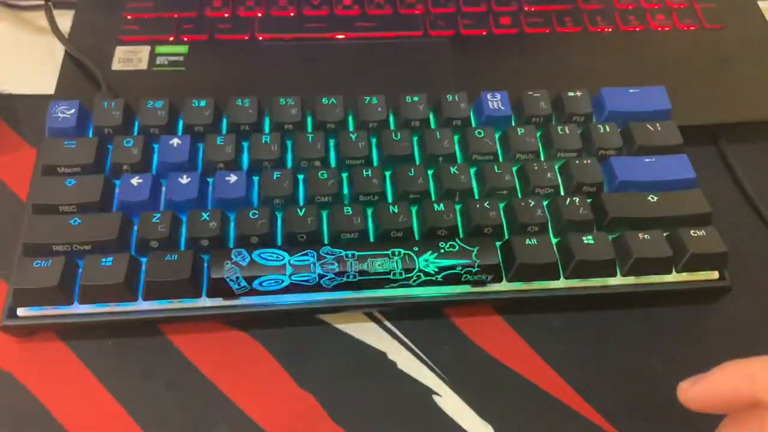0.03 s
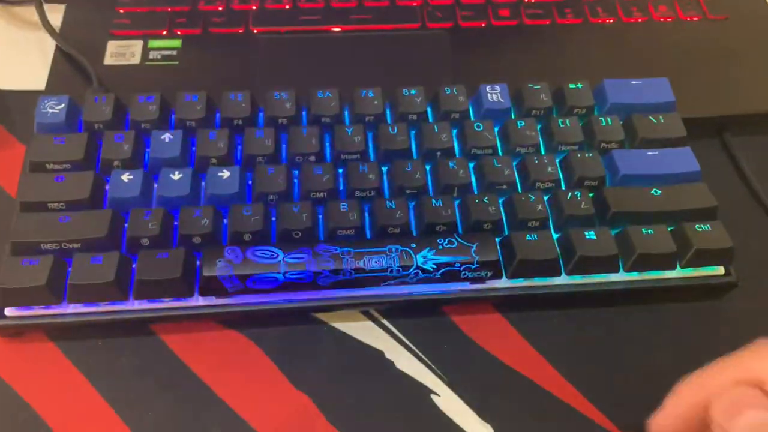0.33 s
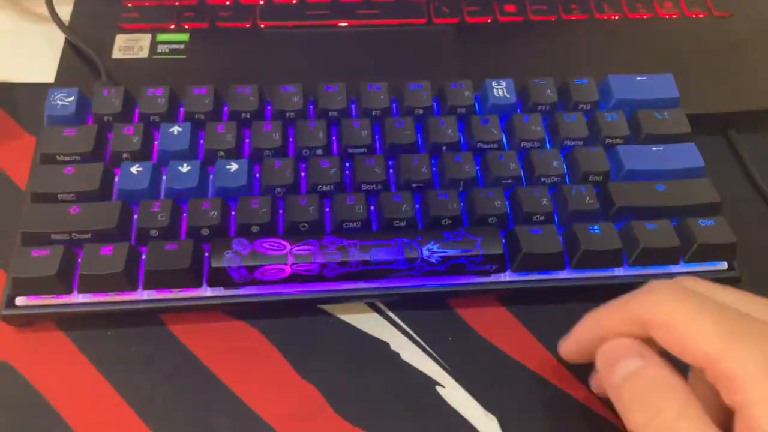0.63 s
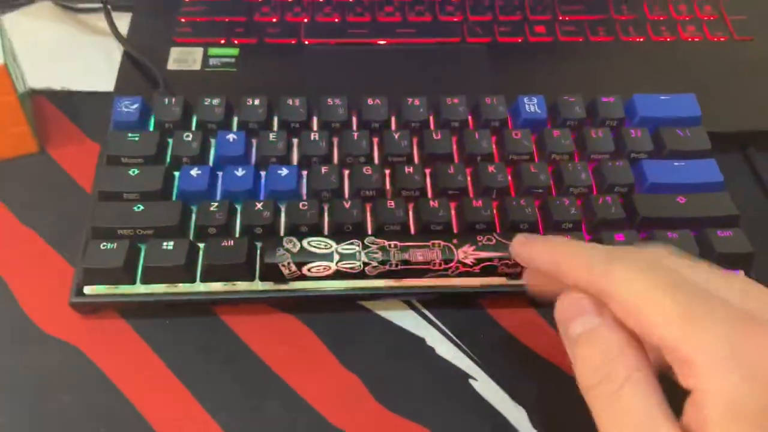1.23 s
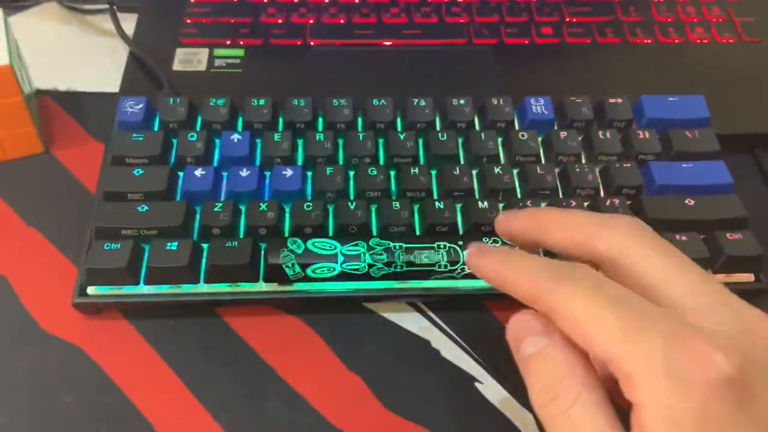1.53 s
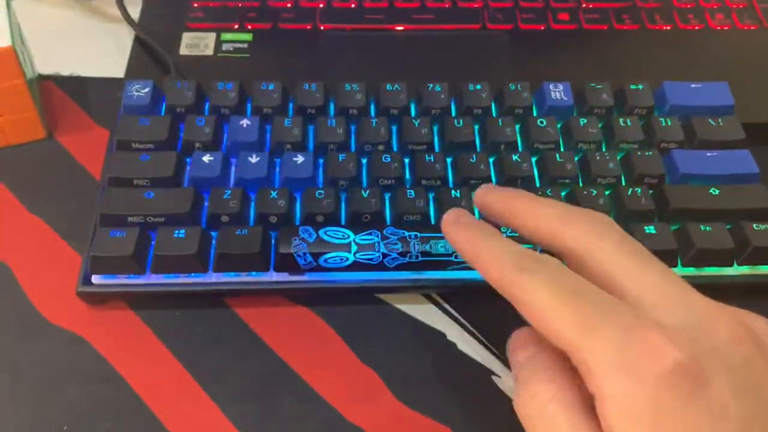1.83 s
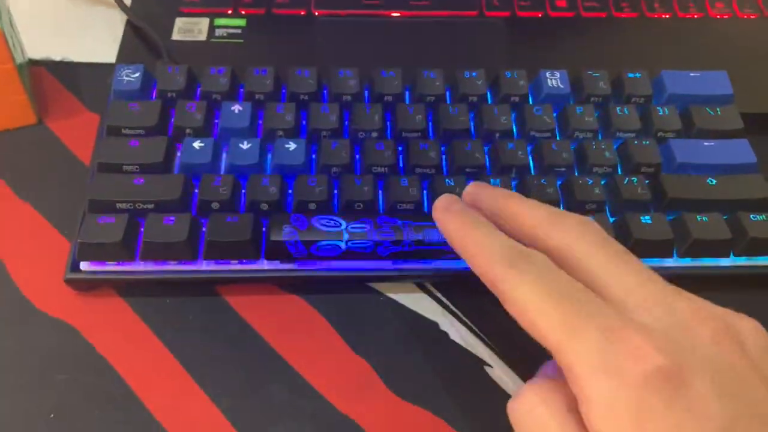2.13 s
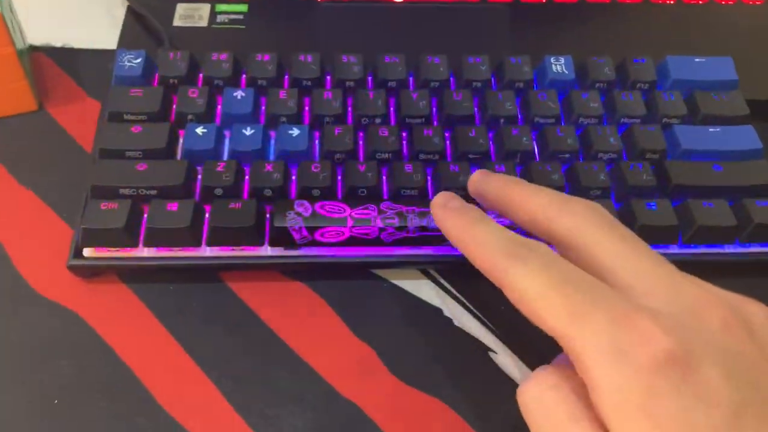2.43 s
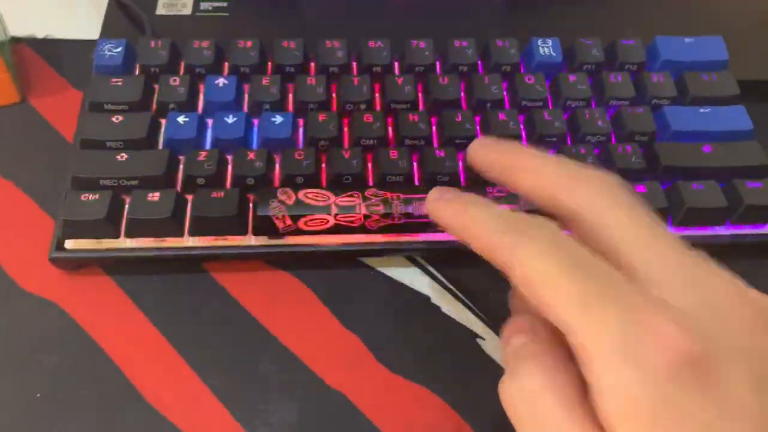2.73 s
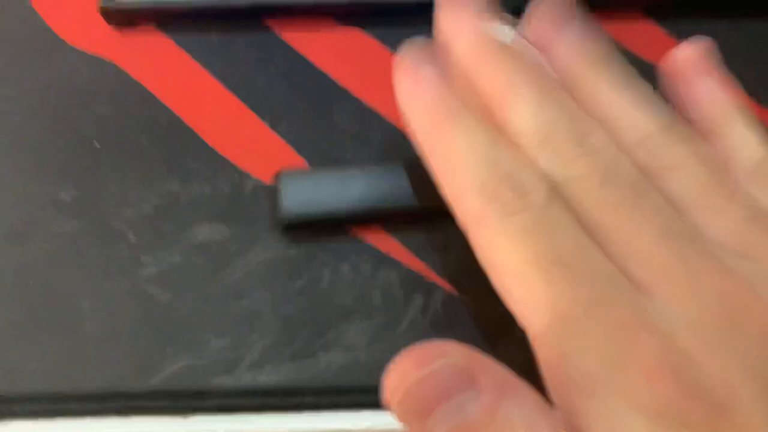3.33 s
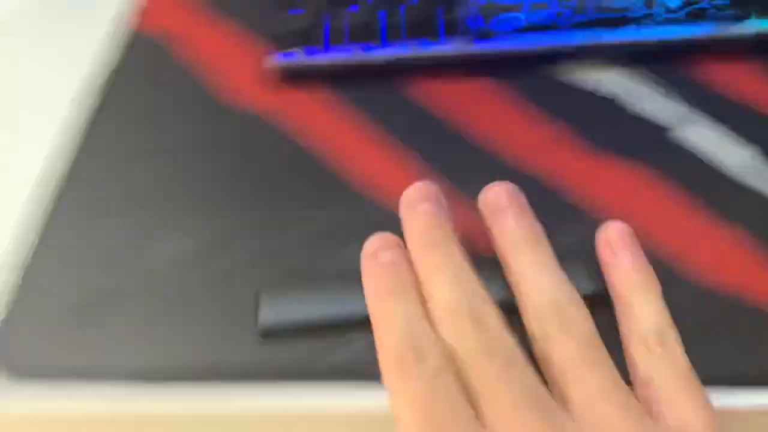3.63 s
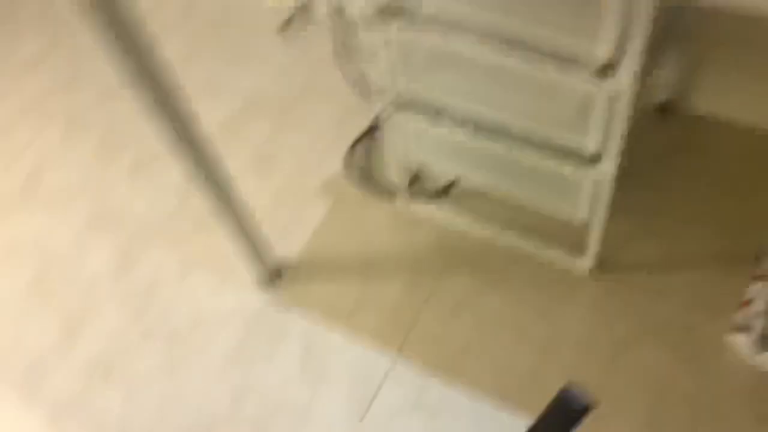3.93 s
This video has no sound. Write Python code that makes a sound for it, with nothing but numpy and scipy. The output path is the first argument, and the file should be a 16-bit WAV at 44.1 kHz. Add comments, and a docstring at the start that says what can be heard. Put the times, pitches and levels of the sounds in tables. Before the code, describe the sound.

Rapid, even taps of a plastic keycap on a padded desk, each a clack with a low thud, come after a quiet stretch of soft hand rustles. They grow louder and end in a short scrape, close up in a small room.

```python
"""A small quiet room: over its rumble a hand moves softly about a desk. Then a long plastic keycap
is knocked on a cloth desk mat eight times, ever harder, and slid off, catching on the weave.
Each tap is a scuff on the cloth, a clack of the cap and a bending wave in the desk top
that sweeps down into a thud, because its low frequencies travel slower."""
import sys
import numpy as np
from scipy import signal
from scipy.fft import rfft, irfft
from scipy.io import wavfile

SR = 44100
rng = np.random.default_rng(int(sys.argv[2]) if len(sys.argv) > 2 else 0)


def to_wav(sig):
    """Store sig (one row per channel, or 1-D mono) as 16-bit WAV at the path in sys.argv[1].

    Samples outside -1..1 are clipped; the rate is SR.
    """
    pcm = np.clip(np.atleast_2d(sig), -1, 1) * 32767
    pcm = np.round(pcm).astype(np.int16)
    wavfile.write(sys.argv[1], SR, pcm.T)  # frames by channels


N = 176400
TIME = np.arange(N) / SR
FFT_SIZE = N + SR
HZ = np.maximum(np.fft.rfftfreq(FFT_SIZE, 1 / SR), 1)


def from_db(db):
    """Decibels to gain."""
    return 10 ** (np.asarray(db) / 20)

def at_hz(points, hz=HZ):
    """Table lookup on a log-frequency axis."""
    freqs, values = np.transpose(points)
    return np.interp(np.log(hz), np.log(freqs), values)

def envelope(rows):
    """Gain from (time [s], level [dB]) rows, silent outside them."""
    times, db = np.transpose(rows)
    return from_db(np.interp(TIME, times, db, left=-200, right=-200))

def filtered(x, response):
    """Applies a frequency response."""
    return irfft(rfft(x, FFT_SIZE) * response, FFT_SIZE)[..., :N]

def add(out, at_s, x):
    """Mixes x into out from at_s on."""
    start = int(at_s * SR)
    out[..., start:start + x.shape[-1]] += x[..., :N - start]


# diffuse field: (frequency [Hz], left-right coherence [0..1])
COHERENCE = [(100, 0.94), (250, 0.79), (500, 0.14), (1000, 0.05), (3000, 0.017), (5000, 0.066),
             (7000, 0.95), (8500, 1), (15000, 1)]

def diffuse(spectrum):
    """Stereo noise from all around: alike in the bass and high treble, unrelated between."""
    alike = np.clip(at_hz(COHERENCE), -1, 1)
    gains = from_db(at_hz(spectrum)) * np.sqrt([(1 + alike) / 2, (1 - alike) / 2])
    mid, side = filtered(rng.standard_normal((2, N)), gains)
    return np.array([mid + side, mid - side])

def wash(spectrum):
    """Diffuse noise, rms 1."""
    x = diffuse(spectrum)
    return x / x.std()


# room background: (frequency [Hz], level [dB])
RUMBLE_SPECTRUM = [(15, -60), (25, -56), (38, -8.5), (58, -2.5), (153, -1), (180, -4.5), (250, -4.5),
                   (400, -19), (500, -20.5), (775, -31.5), (1260, -35.5), (2000, -38), (2700, -34),
                   (3700, -44.5), (6740, -47), (10400, -47.5), (13200, -50), (15200, -57), (16200, -51)]

def room_rumble(level_db=-51):
    """Steady low noise of the room."""
    return from_db(level_db) * wash(RUMBLE_SPECTRUM)


def swell(peak_s, half_width_s, db):
    """Gaussian rise and fall in gain."""
    return from_db(db) * np.exp(-((TIME - peak_s) / half_width_s) ** 2)

def stick_slip(rate_hz=290, spread_db=1):
    """Gain that flickers as rubbing sticks and slips."""
    return from_db(spread_db * np.interp(TIME * rate_hz, np.arange(N), rng.standard_normal(N)))

# hand strokes: (time [s], half-width [s], rustle [dB], hiss [dB])
BRUSHES = [(0.421, 0.066, -65.5, -69.5), (.565, 0.047, -73.5, -72), (.84, 0.11, -68.5, -81),
           (1.072, 0.022, -63.5, -65.5), (2.81, 0.1, -64.5, -84)]
# rustle and skin hiss: (frequency [Hz], level [dB])
RUSTLE_SPECTRUM = [(300, 1), (900, 3), (1600, -4.5), (2700, -0.5), (4000, -7.5), (6500, -14), (10000, -26),
                   (16000, -26)]
HISS_SPECTRUM = [(1000, -20), (4000, -16), (6500, -7), (11000, 2), (13000, 4), (15200, 4), (16300, -18)]

def hand_brushes():
    """A hand rubs softly about: grainy rustle and smooth skin hiss."""
    rustle = sum(swell(at_s, width_s, db) for at_s, width_s, db, _ in BRUSHES)
    hiss = sum(swell(at_s, width_s, db) for at_s, width_s, _, db in BRUSHES)
    return rustle * stick_slip() * wash(RUSTLE_SPECTRUM) + hiss * wash(HISS_SPECTRUM)


# soft bump: (frequency [Hz], level [dB])
BUMP_SPECTRUM = [(25, -35), (55, 2.5), (100, 2), (200, -9), (300, -12), (500, -27.5), (1200, -60)]

def hand_bump():
    """One low swell of rumble as the hand moves."""
    return swell(peak_s=1.008, half_width_s=0.14, db=-45) * wash(BUMP_SPECTRUM)


# fingertip touches: (time [s], level [dB])
TICKS = [(1.0215, -61.5), (1.057, -59.5), (1.074, -64), (1.102, -61)]
# one touch: (frequency [Hz], level [dB])
TICK_SPECTRUM = [(400, -10), (900, -6), (1500, 3), (2900, -2), (4500, -18), (12000, -21)]

def fingertip_ticks(fall_s=0.012):
    """A fingertip touches the keys: faint, fast-decaying noise bursts."""
    bursts = sum(from_db(db) * (TIME >= at_s) * np.exp(-np.abs(TIME - at_s) / fall_s)
                 for at_s, db in TICKS)
    return bursts * wash(TICK_SPECTRUM)


# the cap's edge catches on the cloth: (time [s], length [s], level [dB])
SCUFFS = [(2.88, 0.0061, -31.5), (2.891, 0.0049, -33.5), (2.919, 0.0019, -36), (2.98, 0.0031, -28.5),
          (2.988, 0.011, -33), (3.0743, 0.015, -34.5), (3.087, 0.01, -32.5), (3.1724, 0.0053, -26),
          (3.274, 0.0066, -31.5), (3.278, 0.0082, -38), (3.284, 0.004, -24.5), (3.295, .002, -37),
          (3.3849, 0.0027, -9), (3.4954, 0.0021, -22.5), (3.501, 0.0025, -22.5), (3.514, 0.011, -33),
          (3.593, 0.0018, -28), (3.599, 0.0038, -24), (3.6035, 0.0012, -17), (3.681, 0.0066, -32),
          (3.752, 0.0073, -27), (3.783, 0.0054, -35.5)]
# skid after the last hard tap: (time [s], level [dB])
SKID = [(3.608, -70), (3.613, -40), (3.623, -24.5), (3.639, -20.5), (3.647, -59), (3.675, -67), (3.72, -75)]
# plastic on cloth: (frequency [Hz], level [dB])
SCUFF_SPECTRUM = [(1500, -7), (4000, -3.5), (5500, -12), (7000, 1.5), (8500, -1), (9700, 1.5), (10900, 3.5),
                  (12300, -3.5), (14200, 5), (15500, -2), (16300, -28)]

def cloth_scuffs(rise_s=0.0032, fall_s=0.0021):
    """Plastic rasps over the weave in short bursts and one longer skid."""
    force = envelope(SKID)
    for at_s, length_s, db in SCUFFS:
        rise = np.clip((TIME - at_s) / rise_s, 0, 1)
        fall = np.exp(-np.maximum(TIME - at_s - 0.36 * length_s, 0) / fall_s)
        force += from_db(db) * rise * fall
    rasp = filtered(rng.standard_normal(N), from_db(at_hz(SCUFF_SPECTRUM)))
    return force * rasp / rasp.std()


# the cap lands, rebounds or bumps:
# (time [s], thud [dB], thud pitch [Hz], knock [dB], clack [dB], clack cutoff [Hz])
TAPS = [(2.8829, -16, 87, -38.5, -27.5, 3100), (2.9807, -21.5, 75.4, -39, -33, 2460),
        (3.081, -15, 78, -30, -23.5, 2210), (3.1768, -11, 87.6, -24.5, -14.5, 2700),
        (3.286, -11.5, 79, -14.5, -8.5, 3930), (3.3896, -11, 79.3, -17, -4.5, 3700),
        (3.5007, -52, 79, -19, -19, 2500), (3.5025, -7.5, 91.6, -10, -3, 7150),
        (3.521, -20, 150, -19.5, -40, 1500), (3.6, -47, 83, -19, -10, 3130),
        (3.6054, -12.5, 75, -16, -3, 7050), (3.769, -60, 80, -53, -23, 2200),
        (3.8185, -27.5, 93, -30, -22, 1400), (3.863, -45, 78.4, -38, -26, 2400)]
# cap resonances: (frequency [Hz], relative level [dB], T60 [s])
CAP_MODES = [(952, -3.5, 0.0067), (1264, -4, 0.016), (1450, -2, 0.0085), (1670, -9, 0.0059),
             (1930, -12, 0.0072), (2520, -12, 0.0053), (2914, 8.5, 0.0077), (3950, 4, 0.0086),
             (5120, 3, 0.0045), (7700, 16.5, 0.003), (9900, 3, 0.0021), (14700, 8.5, 0.001004)]
# toneless contact snap: (frequency [Hz], level [dB])
SNAP_SPECTRUM = [(300, -17), (900, -3), (1350, -2), (2000, -3.5), (2500, 0), (3100, 1.5), (3900, 1.5),
                 (5500, -9.5), (8000, -4), (15000, -14)]

def cap_clacks(rise_s=0.0007, snap_fall_s=0.0015, pitch_spread=0.022, spread_db=2):
    """The held cap snaps and rings, brighter on hard taps; its modes vary as the grip changes."""
    out, t = np.zeros(N), TIME[:SR // 10]
    rest_hz, mode_db, t60_s = np.transpose(CAP_MODES)[:, :, None]
    bin_hz = np.maximum(np.fft.rfftfreq(len(t), 1 / SR), 1)
    for at_s, _, _, _, clack_db, cutoff_hz in TAPS:
        hz = rest_hz * np.exp(pitch_spread * rng.standard_normal(rest_hz.shape))
        gains = from_db(mode_db + spread_db * rng.standard_normal(hz.shape))
        gains /= np.sqrt(1 + (hz / cutoff_hz) ** 4)
        tones = np.sin(2 * np.pi * (hz * t + rng.random(hz.shape)))
        ring = (gains * tones * from_db(-60 * t / t60_s)).sum(0) / np.linalg.norm(gains)
        snap_gain = from_db(at_hz(SNAP_SPECTRUM, bin_hz)) / np.sqrt(1 + (bin_hz / cutoff_hz) ** 4)
        noise = irfft(rfft(rng.standard_normal(len(t))) * snap_gain)
        snap = noise / noise.std() * np.exp(-t / snap_fall_s)
        clack = from_db(-1) * ring + from_db(-4) * snap
        add(out, at_s - rise_s / 2, from_db(clack_db) * np.clip(t / rise_s, 0, 1) * clack)
    return out


TRAVEL_S, TRAVEL_REF_HZ, DISPERSION = 0.0185, 101.7, 0.78

def travel_s(hz):
    """Bending-wave delay over the direct path: lows arrive later."""
    return TRAVEL_S * (TRAVEL_REF_HZ / np.maximum(hz, TRAVEL_REF_HZ / 2)) ** DISPERSION

def bending_wave(spectrum, paths, gains, size=16384):
    """One falling sweep per path through the desk top; lengths are relative to the direct path."""
    hz = np.maximum(np.fft.rfftfreq(size, 1 / SR), 1)
    phase = 2 * np.pi * np.outer(paths, np.cumsum(travel_s(hz))) * SR / size
    sweeps = irfft(from_db(at_hz(spectrum, hz)) * np.exp(-1j * phase))
    return np.dot(gains, sweeps)[:size // 2] / np.abs(sweeps[0]).max()

# desk top's deep thud and knock: (frequency [Hz], level [dB])
THUD_SPECTRUM = [(20, -47), (35, -39), (48, -7.5), (62, -4.5), (80, 5), (110, -2.5), (150, -15.5),
                 (250, -21), (500, -61), (1200, -100)]
KNOCK_SPECTRUM = [(30, -51), (80, 9.5), (160, 8), (280, 0), (420, 0), (600, 0), (900, -4.5), (1300, -25),
                  (2500, -18.5), (8000, -75)]

def desk_waves(thud_ref_hz=80, echoes=5):
    """Each tap sends a thud and a knock through the desk; the knock reflects off its edges."""
    out = np.zeros(N)
    for at_s, thud_db, thud_hz, knock_db, _, _ in TAPS:
        tuned_spectrum = np.multiply(THUD_SPECTRUM, [thud_hz / thud_ref_hz, 1])
        thud = bending_wave(tuned_spectrum, paths=[1], gains=[1])
        edge_paths = rng.uniform(1.3, 3.6, echoes)
        edge_gains = from_db(-6.5) * rng.choice([-1, 1], echoes) / np.sqrt(edge_paths)
        knock = bending_wave(KNOCK_SPECTRUM, np.append(1, edge_paths), np.append(1, edge_gains))
        add(out, at_s, from_db(thud_db) * thud + from_db(knock_db) * knock)
    return out


# desk resonances: (frequency [Hz], relative level [dB], T60 [s])
DESK_MODES = [(71.6, -18, 0.16), (124.2, -12.5, 0.44), (148.3, -14, 0.23), (170.9, -21, 0.61),
              (230.3, -24, 0.4), (271.9, -18.5, 0.3), (311.6, -22, 0.31), (471, -21, 0.27),
              (563, -16.5, 0.079), (701, -11.5, 0.072), (860, -24.5, 0.13)]

def desk_ring(knock_above_hz=500):
    """The desk rings on: low modes driven by the thud, high ones by the knock."""
    tap_s, thud_db, _, knock_db, _, _ = np.transpose(TAPS)
    out = np.zeros(N)
    for hz, mode_db, t60_s in DESK_MODES:
        knock_share = at_hz([(TRAVEL_REF_HZ, 0), (knock_above_hz, 1)], hz)
        arrivals = np.round((tap_s + travel_s(hz)) * SR).astype(int)
        blows = np.full(N, 1e-18)   # floor avoids denormals
        blows[arrivals] = from_db(mode_db + thud_db + knock_share * (knock_db - thud_db))
        radius, angle = from_db(-60 / (t60_s * SR)), 2 * np.pi * hz / SR
        out += signal.lfilter([0, np.sin(angle)], [1, -2 * radius * np.cos(angle), radius ** 2], blows)
    return out


# hard-edge contacts: (time [s], level [dB])
PINGS = [(3.273, -25), (3.287, -24.5), (3.3878, -5.5)]

def cap_pings(pitch_hz=8600, t60_s=0.016):
    """A hard edge sets off a thin ping in the cap."""
    out, t = np.zeros(N), TIME[:SR // 10]
    ping = np.sin(2 * np.pi * pitch_hz * t) * from_db(-60 * t / t60_s)
    for at_s, db in PINGS:
        add(out, at_s, from_db(db) * ping)
    return out


# slide off the mat: (time [s], level [dB])
SLIDE = [(3.74, -70), (3.772, -38), (3.80, -33), (3.825, -30.5), (3.86, -32.5), (3.90, -38.5),
         (3.95, -47.5), (4.0, -46)]
# its friction: (frequency [Hz], level [dB])
SLIDE_SPECTRUM = [(20, -49), (55, 0), (120, -7.5), (230, 0), (350, -8.5), (600, -20), (1100, -22.5),
                  (1900, -22.5), (2900, -28), (3600, -33), (4600, -36), (7000, -42.5), (10500, -43),
                  (13000, -43), (15500, -58)]

def mat_slide():
    """Cap and hand rub across the mat, sticking and slipping."""
    return envelope(SLIDE) * stick_slip() * wash(SLIDE_SPECTRUM)


# one catch on the weave: (frequency [Hz], level [dB])
CATCH_SPECTRUM = [(250, -6), (600, 0.5), (1200, -4), (1900, -3), (2800, -7), (3600, 0.5), (4400, -17.5),
                  (8000, -26), (15000, -45)]

def weave_catches(rate_hz=180, spread_db=4, relative_db=-8.5):
    """The sliding cap catches on the weave in small, uneven clicks."""
    sizes = from_db(spread_db * np.minimum(rng.exponential(1, N), 2)) * rng.choice([-1, 1], N)
    caught = rng.random(N) < rate_hz / SR
    clicks = filtered(sizes * caught, from_db(at_hz(CATCH_SPECTRUM)))
    return from_db(relative_db) * envelope(SLIDE) * clicks / clicks.std()


# reverberation: (frequency [Hz], level re direct sound [dB])
REVERB_SPECTRUM = [(60, -9), (130, -11.5), (250, -0.5), (400, -4), (600, -7.5), (1500, -3), (2600, -8),
                   (3500, -10.5), (4500, -9.5), (6000, -4.5), (8500, -16), (10500, -9.5), (13200, -12),
                   (15000, -16.5)]
# its decay: (frequency [Hz], T60 [s])
REVERB_T60 = [(100, 0.34), (500, 0.33), (2500, 0.25), (7000, 0.23), (15000, 0.25)]

def room_reverb(x, tail_s=0.45, build_s=0.0014, block_s=0.1):
    """Diffuse tail, shorter in the treble; a new echo pattern per block stands for the cap moving."""
    out, t = np.zeros((2, N)), TIME[:int(tail_s * SR)]
    echoes = diffuse(REVERB_SPECTRUM)
    hz = np.fft.rfftfreq(len(t), 1 / SR)
    low_edge_hz = 40 * 2. ** np.arange(9)[:, None, None]
    octaves = (hz >= low_edge_hz) & (hz < 2 * low_edge_hz)
    decay_per_s = np.log(1000) / at_hz(REVERB_T60, low_edge_hz * np.sqrt(2))
    decay = np.exp(-decay_per_s * t) * np.sqrt(2 * decay_per_s / SR)   # unit energy
    build = np.clip(t / build_s, 0, 1)
    first, block = int((TAPS[0][0] - block_s / 2) * SR), int(block_s * SR)
    for k, start in enumerate(range(first, N, block)):
        pattern = rfft(echoes[:, k * len(t) // 2:][:, :len(t)])
        tail = (irfft(pattern * octaves, len(t)) * decay * build).sum(0)
        add(out, start / SR, signal.fftconvolve(x[None, start:start + block], tail))
    return out


# direct-sound balance: (frequency [Hz], left minus right [dB])
BALANCE = [(200, 0), (400, 1.5), (750, 4), (1500, 1), (3500, -1), (7000, 0)]
# phase between the microphone ports: (frequency [Hz], left lead [rad])
PORT_PHASE = [(220, 0), (700, 1.1), (1700, 0.2), (3000, 3.0), (4500, 4.4), (6300, 6.1), (8500, 3.14),
              (11000, 0), (13400, -3.14), (15800, -6.1)]

def scene():
    """Taps arrive directly and via the room; two close microphone ports shift the whole mix's phase."""
    taps = desk_waves() + desk_ring() + cap_clacks() + cap_pings() + cloth_scuffs() + weave_catches()
    side = np.array([[0.5], [-0.5]])
    direct = filtered(taps, from_db(side * at_hz(BALANCE)))
    reverb = room_reverb(taps)
    hand = hand_brushes() + fingertip_ticks() + hand_bump() + mat_slide()
    mix = direct + reverb + hand + room_rumble()
    return filtered(mix, np.exp(1j * side * at_hz(PORT_PHASE)))

def record(dry):
    """Steep low-pass at 16.4 kHz."""
    return signal.sosfilt(signal.ellip(10, 0.1, 80, 16400, fs=SR, output="sos"), dry)


dry = scene()
out = record(dry)
to_wav(out)
```